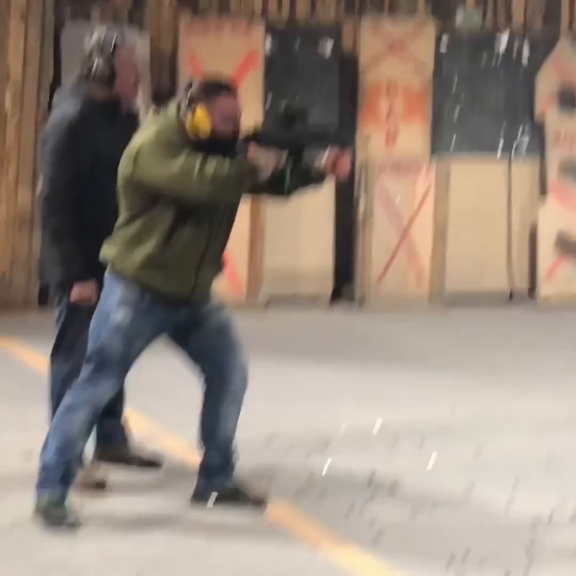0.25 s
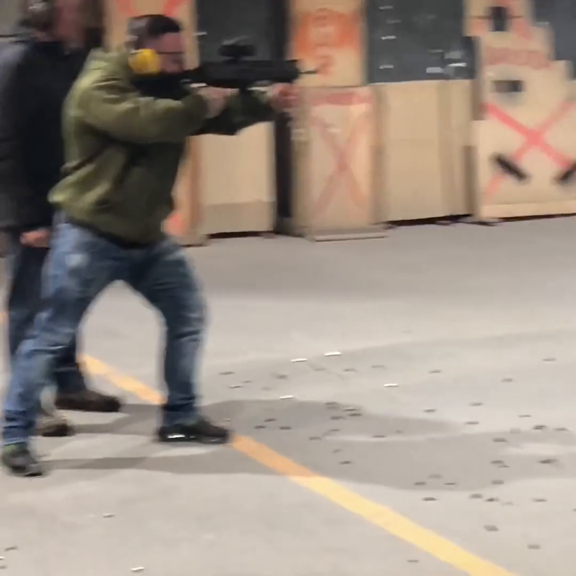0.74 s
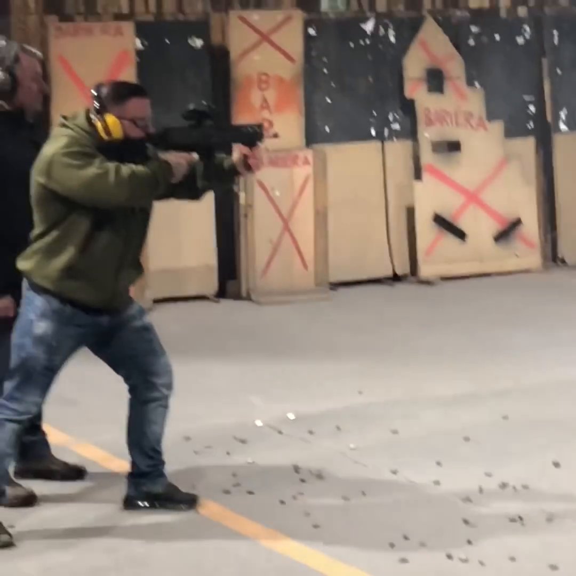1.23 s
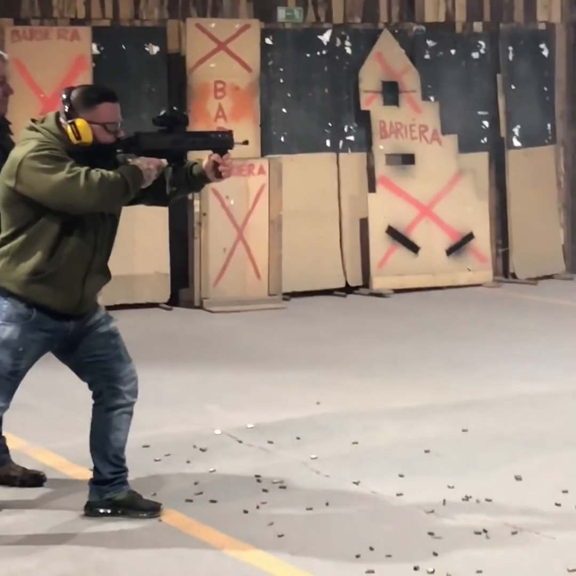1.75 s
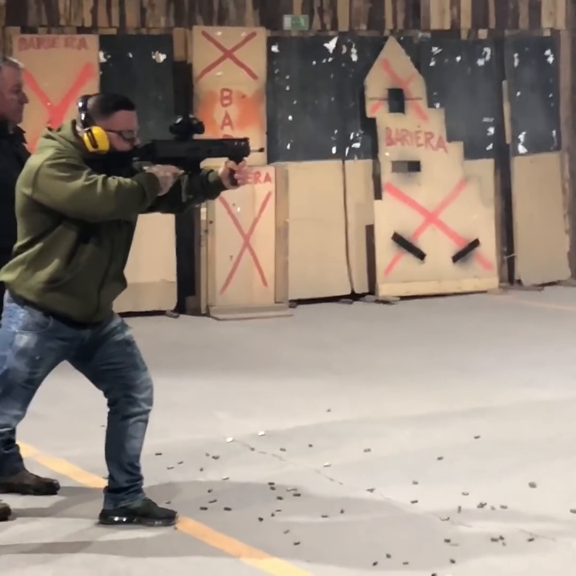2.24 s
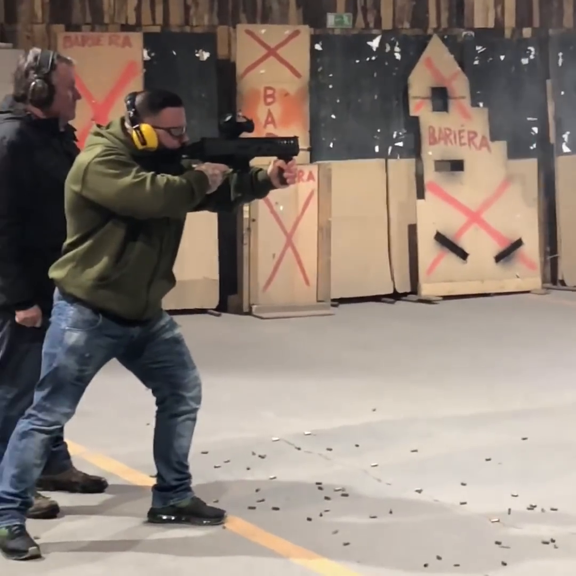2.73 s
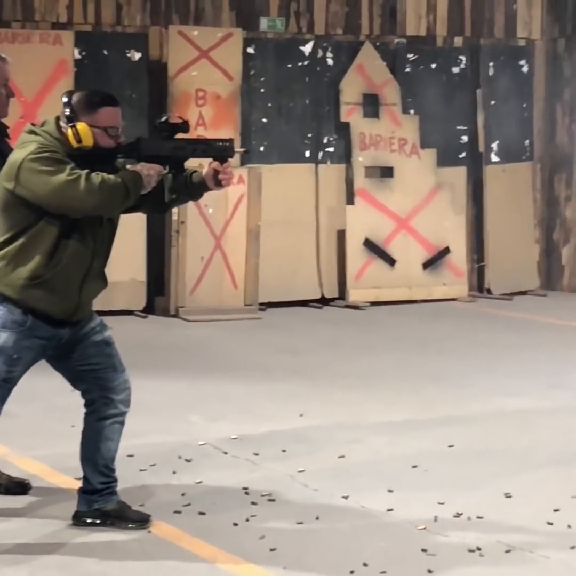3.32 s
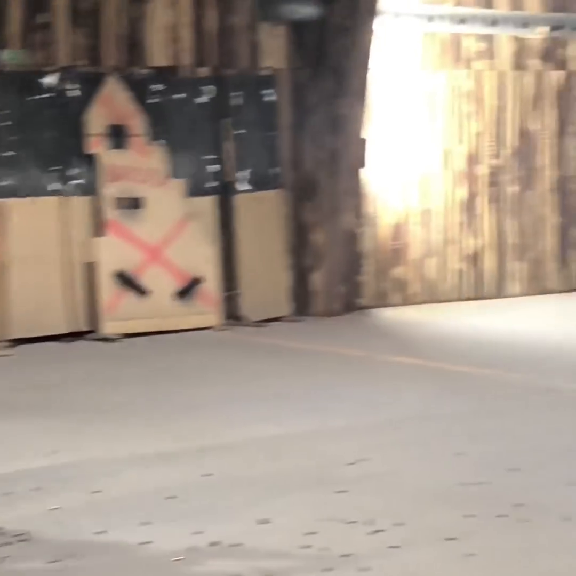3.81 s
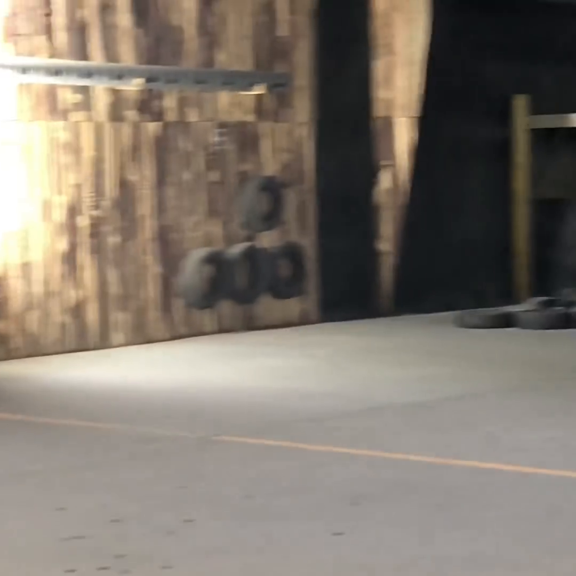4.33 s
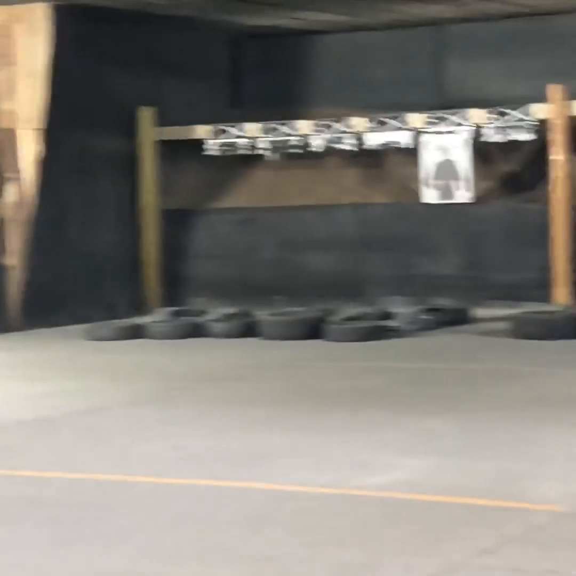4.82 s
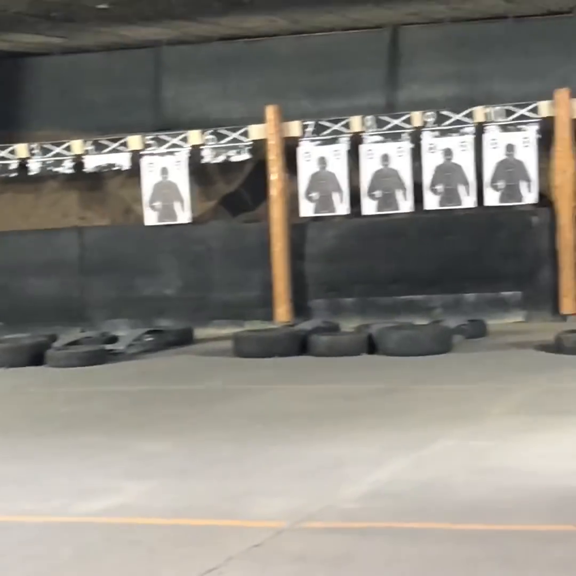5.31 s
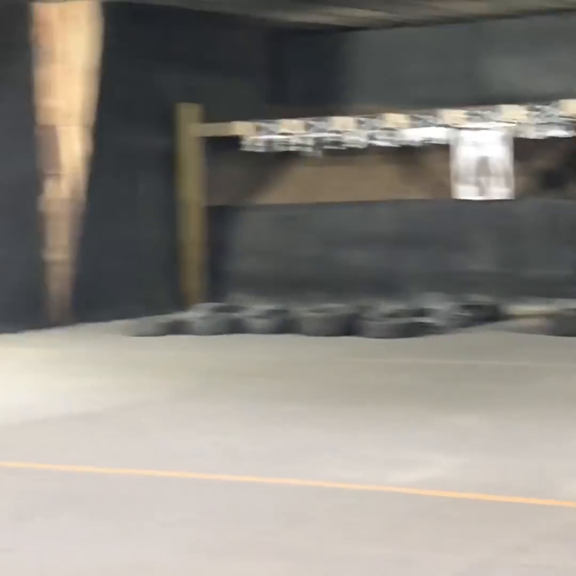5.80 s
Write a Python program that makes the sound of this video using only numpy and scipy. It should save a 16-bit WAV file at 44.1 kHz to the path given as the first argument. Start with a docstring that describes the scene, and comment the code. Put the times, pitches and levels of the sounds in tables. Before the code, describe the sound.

Single rifle shots crack and roar through an indoor range, brass cases clinking on concrete between them, ending with two very quick shots.

```python
"""A concrete indoor range still roars from a compact rifle's shot, fired a few metres from a phone.
A brass case bounces and rings on the floor, shoes scuff, and the ventilation's hum slowly swells.
At 2.5 s and 3.9 s the rifle cracks again: the microphone overloads, the hall roars, a case falls,
and the phone turns its gain down, so the hum ducks and swells back.
Near 5.7 s come two quick shots, and the sound drops out for an instant between them."""
import sys
import numpy as np
from scipy import signal
from scipy.fft import rfft, irfft
from scipy.io import wavfile
from scipy.ndimage import uniform_filter1d

SR = 44100
rng = np.random.default_rng(int(sys.argv[2]) if len(sys.argv) > 2 else 0)


def unload_audio(sound):
    """Save the sound as a 16-bit wav file, at the path given as the first command line argument."""
    columns = np.transpose(np.atleast_2d(sound))
    # keep every value between -1 and 1, then stretch to whole-number steps
    steps = np.round(np.clip(columns, -1, 1) * 32767)
    wavfile.write(sys.argv[1], SR, steps.astype(np.int16))


N = 267246
TIME = np.arange(N) / SR


def undb(db):
    """Turn decibels into a gain to multiply by."""
    return 10 ** (np.asarray(db) / 20)


def unit(x):
    """Scale a sound to an average (rms) level of 1."""
    return x / np.sqrt(np.mean(x ** 2))


def at_hz(points, hz):
    """Read between the rows of a (pitch_hz, value) table, with octaves evenly spaced."""
    pitches, values = np.transpose(points)
    return np.interp(np.log(np.maximum(hz, 1)), np.log(pitches), values)


def noise(colour, size):
    """Noise shaped by a colour: a table of how loud each pitch is."""
    gains = undb(at_hz(colour, np.fft.rfftfreq(size, 1 / SR)))
    return unit(irfft(rfft(rng.standard_normal(size)) * gains, size))


def resonance(hz, width_hz, size):
    """Noise that rings around one pitch."""
    off_pitch = 2 * (np.fft.rfftfreq(size, 1 / SR) - hz) / width_hz
    return unit(irfft(rfft(rng.standard_normal(size)) / (1 + off_pitch ** 2), size))


# colour of rushing air: pitch_hz, level_db
AIR_COLOUR = [(20, -3), (28, -7), (50, -11), (110, -3.5), (185, -10), (326, -18.5), (427, -27),
              (545, -25.5), (734, -28.5), (950, -31.5), (2280, -37), (7310, -55.5), (13200, -63),
              (16000, -86)]
# notes that ring in the air ducts: pitch_hz, width_hz, level_db
DUCT_NOTES = [(160, 29, -55), (243, 60, -58.5), (570, 120, -64), (833, 330, -63.5)]
# the fans' throbbing hum: pitch_hz, level_db
FAN_HUMS = [(115.6, -45.5), (98.6, -57), (121.3, -53), (557, -68), (862, -66.5)]
def ventilation(air_db=-44.5, wander_hz=2.4):
    """Air rushes, ducts drone and fans hum, their speed wandering a little."""
    air = undb(air_db) * noise(AIR_COLOUR, N)
    air += sum(undb(db) * resonance(hz, width, N) for hz, width, db in DUCT_NOTES)
    for hz, db in FAN_HUMS:
        pitch_hz = hz + wander_hz * resonance(2, 1.9, N)
        air += undb(db) * unit(np.sin(2 * np.pi * np.cumsum(pitch_hz) / SR))
    return air


# colour of a rub: pitch_hz, level_db
SCUFF_COLOUR = [(300, -8), (1500, 7.5), (5000, -4), (9000, -9), (15000, -29)]
# each rub, and the faint click at 2.407 s: peak_s, level_db, length_s
RUBS = [(.347, -52.5, 0.028), (.865, -63.5, 0.07), (.896, -55, 0.016), (2.407, -61, 0.0049),
        (4.665, -46.5, 0.011)]
def scuffs():
    """Shoes and clothing rub softly, and a faint click comes just before the second shot."""
    swells = sum(undb(db) * np.exp(-((TIME - s) / length) ** 2) for s, db, length in RUBS)
    return noise(SCUFF_COLOUR, N) * swells


# how long the hall's echo takes to fall by 60 dB: pitch_hz, fade_s
HALL_FADE = [(60, 0.6), (200, 0.78), (500, 0.83), (1100, 0.74), (2600, 0.73), (5000, 0.62), (8000, 0.46),
             (14000, 0.34)]
def die_away(x, t):
    """The hall fades each half octave at its own rate, the highest fastest."""
    octaves = np.log2(np.maximum(np.fft.rfftfreq(len(x), 1 / SR), 1))
    spectrum, out = rfft(x), 0
    for octave in np.arange(4, 15, .5):
        band = irfft(spectrum * np.maximum(1 - 2 * abs(octaves - octave), 0), len(x))
        out = out + band * np.exp(-np.log(1000) * t / at_hz(HALL_FADE, 2 ** octave))
    return out


# colour of brass ticking on concrete: pitch_hz, level_db
TICK_COLOUR = [(1500, -45), (3300, -23), (5000, 10), (6200, -6), (9000, -11), (13000, -13.5),
               (16000, -27.5)]
def clink(low_hz, high_hz, contact_s=.00019, tick_s=.0016, ring_s=.05, spin_hz=22, shimmer_db=-11):
    """Brass hits concrete: a tick, then two close notes that throb as the case tumbles."""
    t = np.arange(SR // 2) / SR
    turn, pace, share = rng.random(3)
    tick = noise(TICK_COLOUR, len(t)) * (1 - np.exp(-t / contact_s)) * np.exp(-t / tick_s)
    low = np.sqrt(share) * np.sin(2 * np.pi * low_hz * t)
    high = np.sqrt(1 - share) * np.sin(2 * np.pi * high_hz * t)
    tumble = 1 + .5 * np.sin(2 * np.pi * (spin_hz * (.5 + pace) * t + turn))
    shimmer = undb(shimmer_db) * resonance((low_hz + high_hz) / 2, 330, len(t))  # the ring's echo
    fade = (np.exp(-t / .016) + .5 * np.exp(-t / ring_s)) / 2
    ring = ((low + high) * tumble + shimmer) * fade
    return tick, ring * (1 - np.exp(-t / .0008))  # the tube rings once it has left the floor


# brass tubes thrown out by the rifle; a flip is the wait from one end landing to the other:
# start_s, low_pitch_hz, high_pitch_hz, flip_s, skitter_start_s, skitter_length_s
BRASS_CASES = [(0, 10500, 10770, .014, .61, .2), (2.5, 10840, 10890, .013, 3.43, .42),
               (3.9, 10925, 10965, .024, 5.22, .3)]
def rolling(level_db=-89.5):
    """Each case's rim scrapes faintly over the concrete as it settles."""
    swell = sum(np.exp(-((TIME - s) / length_s - .5) ** 2) for *_, s, length_s in BRASS_CASES)
    return undb(level_db) * swell * noise(TICK_COLOUR, N)


def case_at(s):
    """The case that is falling at time s."""
    return [case for case in BRASS_CASES if case[0] <= s][-1]


# hard bounces on the floor, levels before the brass's overall gain: start_s, tick_db, ring_db
FLOOR_BOUNCES = [(.151, -45.5, -42.5), (.434, -49.5, -70), (0.5326, -47, -62), (.594, -58.5, -82),
                 (.639, -61, -63.5), (.7586, -60.5, -73), (3.040, -47.5, -48.5), (3.2671, -56, -57.5),
                 (3.3792, -58, -53), (3.513, -61.5, -87.5), (4.578, -32.5, -55), (5.0247, -46, -58),
                 (5.2054, -54.5, -68), (5.3723, -64, -66)]
def touches(flip_tick_db=-19, flip_ring_db=1, skitters=7, skitter_tick_db=-69, skitter_ring_db=-74.5):
    """List every touch: a case lands on one end, then the other, and at last skitters to rest."""
    rows = list(FLOOR_BOUNCES)
    for s, tick_db, ring_db in FLOOR_BOUNCES:
        _, _, _, flip_s, _, _ = case_at(s)
        rows.append((s + flip_s, tick_db + flip_tick_db, ring_db + flip_ring_db))
    for *_, from_s, length_s in BRASS_CASES:
        for settled in (np.arange(skitters) + rng.random(skitters)) / skitters:
            fade_db = -8 * settled
            rows.append((from_s + length_s * settled, skitter_tick_db + fade_db, skitter_ring_db + fade_db))
    return rows


def add(track, s, sound):
    """Mix a sound into the track from time s on."""
    start = int(round(s * SR))
    a, b = max(start, 0), min(start + len(sound), N)
    track[a:b] += sound[a - start:b - start]


def falling_brass(gain_db=16, echo_db=-44):
    """Cases bounce and ring on the floor; the hall echoes their ticks."""
    ticks, rings, t = np.zeros(N), np.zeros(N), np.arange(SR) / SR
    for s, tick_db, ring_db in touches():
        _, low_hz, high_hz, *_ = case_at(s)
        tick, ring = clink(low_hz, high_hz)
        add(ticks, s, undb(tick_db) * tick)
        add(rings, s, undb(ring_db) * ring)
    echo = signal.fftconvolve(ticks, die_away(rng.standard_normal(len(t)), t))[:N]
    return (ticks + rings + rolling() + undb(echo_db) * echo) * undb(gain_db)


def linger(t, hz=1100, width_hz=850, level_db=-22, fade_s=1.265):
    """Sound running along the range keeps a faint middle-pitched ring alive."""
    return undb(level_db) * resonance(hz, width_hz, len(t)) * np.exp(-np.log(1000) * t / fade_s)


# the first echoes of a shot: delay_s, level_db, fade_s
FIRST_ECHOES = [(.0098, 4, .0035), (0.0338, 1.5, 0.011), (0.069, 0.5, .004), (.079, 2, 0.0044)]
def slaps(t):
    """Loudness of the first echoes: each arrives suddenly and fades fast."""
    return sum(undb(db) * (t > s) * np.exp(-abs(t - s) / fade) for s, db, fade in FIRST_ECHOES)


def far_wall(t, level_db=-3, fade_s=.026):
    """The last of the first echoes brings a surge in the roar."""
    since = t - FIRST_ECHOES[-1][0]
    return undb(level_db) * (since > 0) * np.exp(-abs(since) / fade_s)


def limit(x, window_s=.02):
    """Gently hold the running average level under 1."""
    power = abs(uniform_filter1d(x ** 2, int(window_s * SR)))
    return x / np.sqrt(1 + power)


# colour of the hall's roar: pitch_hz, level_db
ROAR_COLOUR = [(40, -18.5), (110, -15), (270, -11.5), (420, -14), (600, -5.5), (820, 3.5), (1080, 1.5),
               (1450, -4), (1900, -10), (2700, -8.5), (3400, -13), (5300, -12), (8000, -16), (11000, -17),
               (16000, -31.5)]
def roar(t, drive_db, body_db, ripple_hz, share, build_s=.088, scatter_db=-2, flutter_db=.5):
    """Bright first echoes blur into a roar that builds, is held at a ceiling and dies away."""
    colour = [(hz, db + body_db * np.exp(-np.log2(hz / 370) ** 2)) for hz, db in ROAR_COLOUR]
    blur = noise(colour, len(t))
    scatter = undb(scatter_db) * (1 - np.exp(-t / .01)) * noise(BLAST_COLOUR, len(t))
    swell = undb(drive_db) * (1 - np.exp(-(t / build_s) ** 3) + far_wall(t))
    hall = die_away(scatter + swell * blur, t)
    hall += slaps(t) * noise(BLAST_COLOUR, len(t)) + swell * linger(t)
    # a surface beside the phone adds a duller copy, lifting pitches ripple_hz apart
    near = uniform_filter1d(np.roll(hall, round(SR / ripple_hz)), size=3)
    hall = (hall + share * near) / np.sqrt(1 + share ** 2)
    clumps = unit(uniform_filter1d(rng.standard_normal(len(t)), size=300))  # echoes come in clumps
    return limit(hall) * undb(flutter_db * clumps)


def thump(t, rise_s=.0019, fade_s=.027):
    """The overloaded microphone swings back to rest, ever more slowly: a falling boom."""
    swing = np.cos(2 * np.pi * 1.33 * np.log((t + 1 / SR) / .0054))
    return swing * (1 - np.exp(-t / rise_s)) ** 2 * np.exp(-t / fade_s)


# colour of the blast from the barrel: pitch_hz, level_db
BLAST_COLOUR = [(100, -11), (400, -1), (900, 1), (1500, -0.5), (2600, -1), (5500, -4), (8000, -8.5),
                (11000, -9.5), (16000, -22.5)]
def crack(t, length_s=.0052, rise_s=.00064):
    """The blast: a few milliseconds of pressure with squashed peaks and a sudden end."""
    blast = unit(np.tanh(noise(BLAST_COLOUR, len(t))))
    return blast * np.minimum(t / rise_s, 1) / (1 + (t / length_s) ** 8)


# the shots, the first just before the start; drive pushes the roar against its ceiling, body warms it:
# start_s, crack_db, thump_db, ceiling_db, drive_db, body_db, ripple_hz, reflected_share
RIFLE_SHOTS = [(-.41, -3, 0, -1, 13, 4.5, 1400, .3), (2.4546, 11.5, 10.5, 0, 19, 2, 1335, 0.48),
               (3.898, 9, 9, 4, 15, 2.5, 1365, 0.48), (5.6415, 8.5, 8, 2, 6.5, 9, 1530, .25),
               (5.7150, 7, 8, 3.5, 7.5, 4.5, 1530, .25)]
def rifle(gain_db=1):
    """Every shot is a crack, a thump and the roar of the hall."""
    out, t = np.zeros(N), np.arange(2 * SR) / SR
    for s, crack_db, thump_db, ceiling_db, drive_db, body_db, ripple_hz, share in RIFLE_SHOTS:
        hall = roar(t, drive_db, body_db, ripple_hz, share)
        add(out, s, undb(crack_db) * crack(t) + undb(thump_db) * thump(t) + undb(ceiling_db) * hall)
    return out * undb(gain_db)


def scene():
    """Shots, falling brass, scuffs and the air of the range, in one channel."""
    return (rifle() + falling_brass() + scuffs() + ventilation())[None]


def gain_control(x, threshold_db=-22, range_db=22, release_db_per_s=9, start_cut_db=21):
    """Loud sound makes the phone turn itself down at once; it then creeps back up."""
    level_db = 10 * np.log10(abs(uniform_filter1d(x ** 2, size=128)) + 1e-12)
    wanted_db = np.clip(2 * (level_db - threshold_db), 0, range_db)
    released_db = release_db_per_s * TIME
    cut_db = np.maximum.accumulate(np.maximum(wanted_db + released_db, start_cut_db)) - released_db
    return x * undb(-cut_db)


def dropout(gone_s=5.705, back_s=5.714, fade_s=.021, back_db=-11, recover_s=.028):
    """Gain of the gap between the last two shots: a fade, silence, then a quiet return that recovers."""
    leaving = np.clip((gone_s - TIME) / fade_s, 0, 1) ** 2
    recovered = np.clip((TIME - back_s) / recover_s, 0, 1) ** 3
    return leaving + (TIME > back_s) * undb(back_db * (1 - recovered))


def record(dry, top_hz=16000):
    """The phone adjusts its gain, drops out once, rounds the peaks and cuts the highest treble."""
    rounded = np.tanh(gain_control(dry[0]) * dropout())
    treble_cut = signal.ellip(8, .2, 70, top_hz, fs=SR, output="sos")
    return signal.sosfilt(treble_cut, rounded)[None]


dry = scene()
out = record(dry)
unload_audio(out)
```